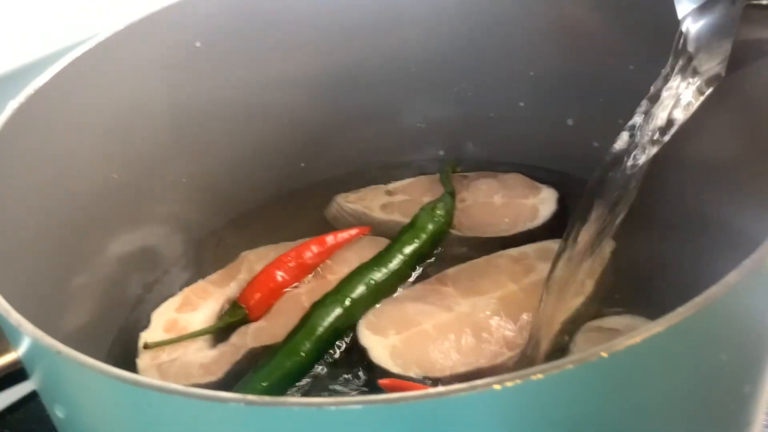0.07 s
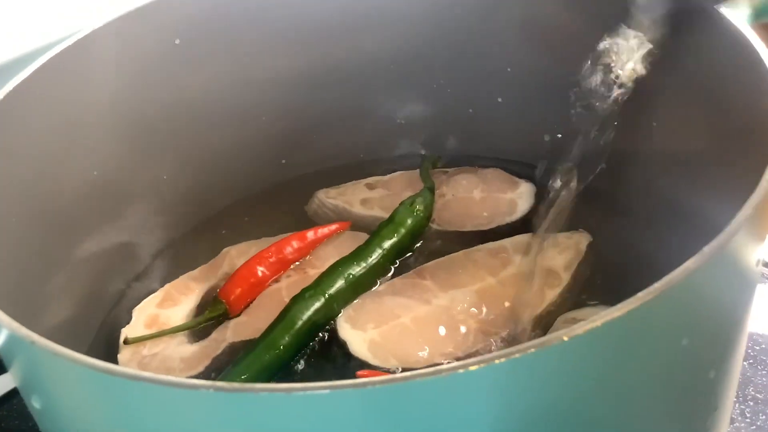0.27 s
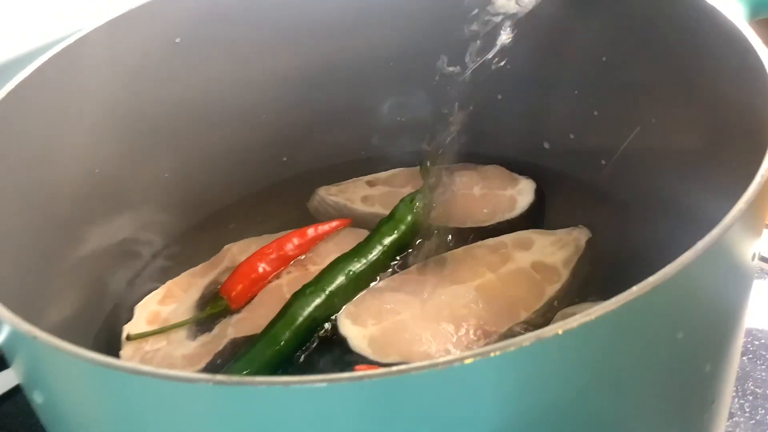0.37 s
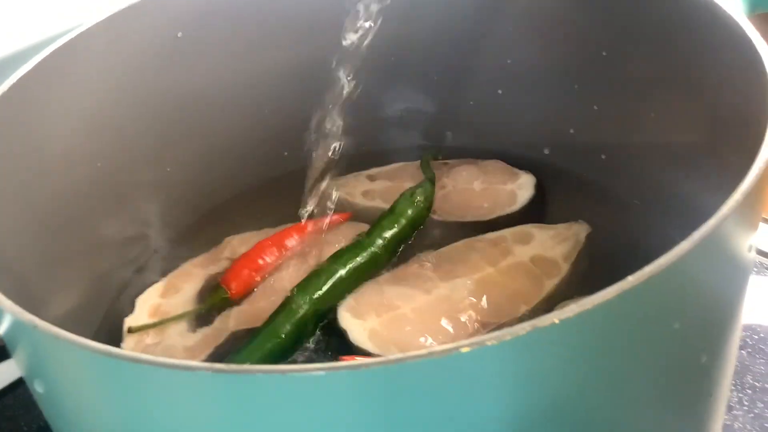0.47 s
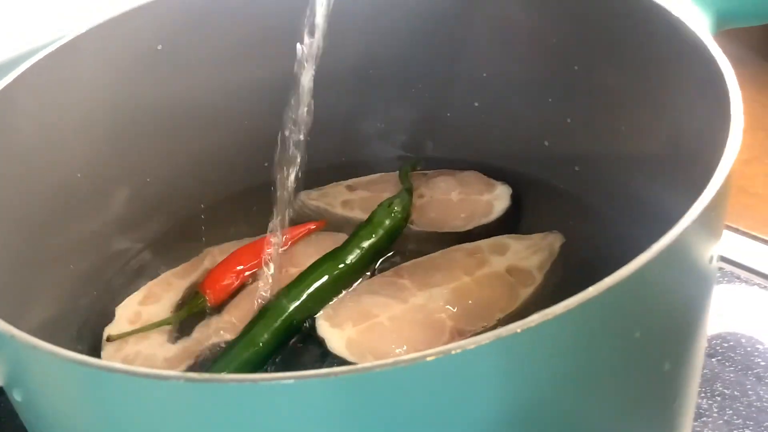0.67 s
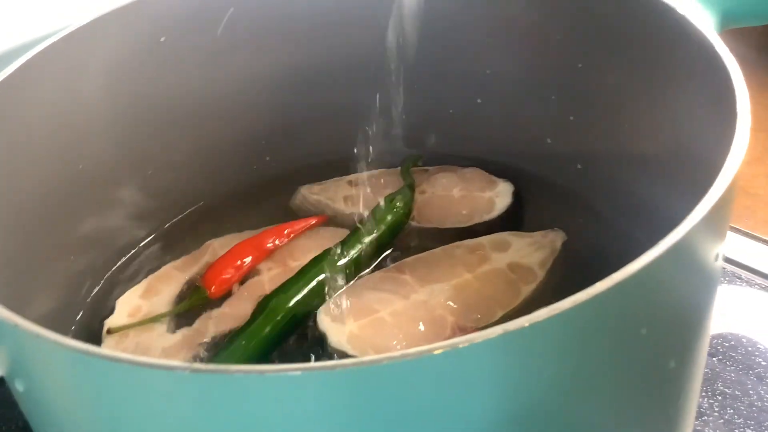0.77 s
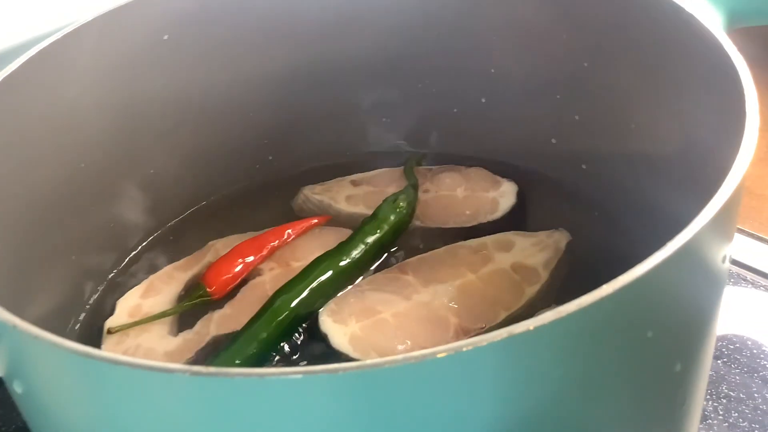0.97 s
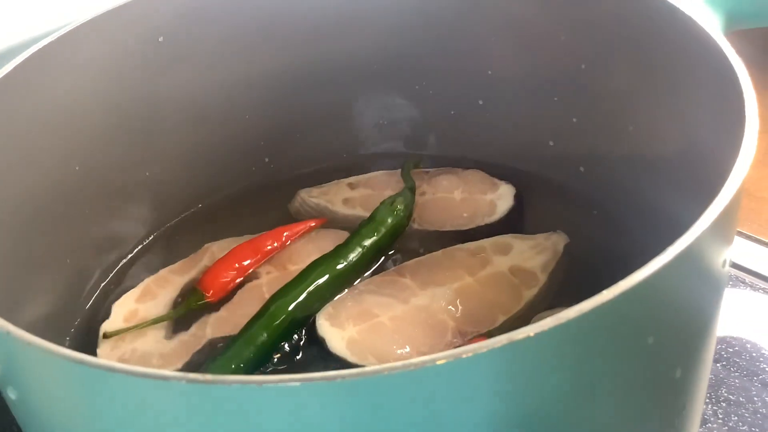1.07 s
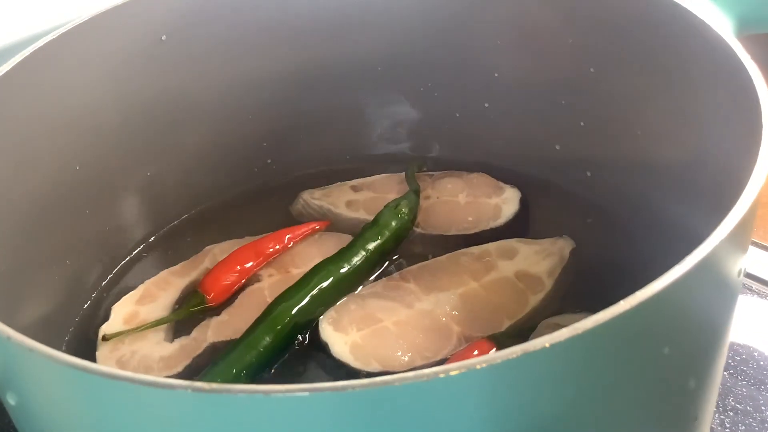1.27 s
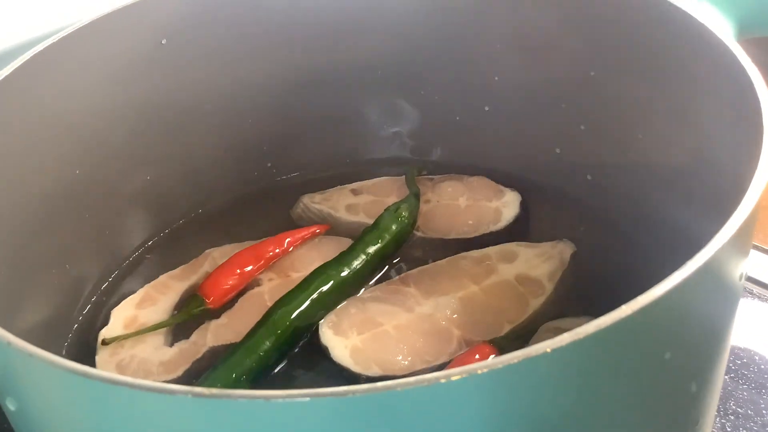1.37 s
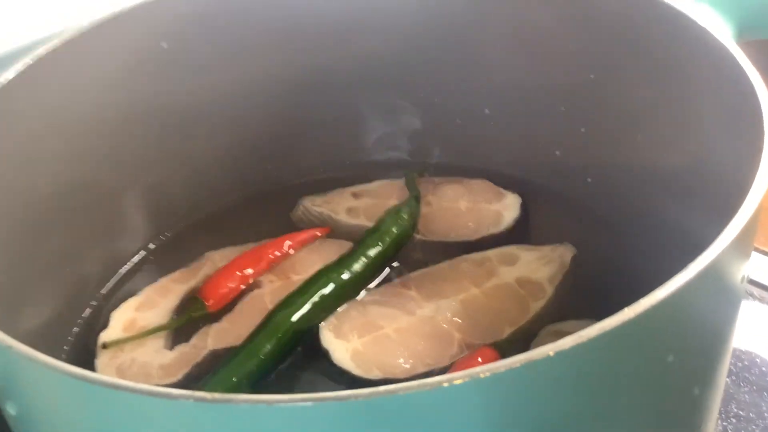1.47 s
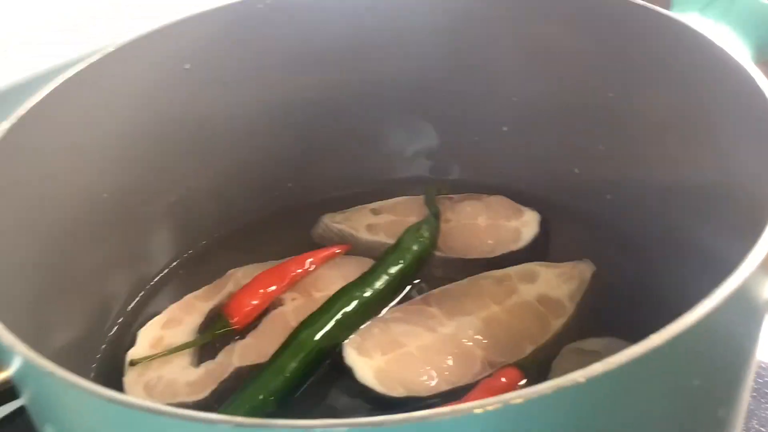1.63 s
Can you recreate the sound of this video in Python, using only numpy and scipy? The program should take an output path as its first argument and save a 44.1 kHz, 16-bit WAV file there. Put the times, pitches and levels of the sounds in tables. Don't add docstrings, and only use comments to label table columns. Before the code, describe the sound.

Water pours into a metal pot from the start, a light fizzing stream with small splashes, droplets and low gulps around 0.2-0.3 s. It thins near 0.45 s, then breaks into louder slapping splashes from 0.55 to 0.85 s, with bright ringing bubbles and short gurgles. By 1.05 s only faint drips remain over a quiet fridge hum. From 1.5 s something rubs softly along the counter.

```python
import sys
import numpy as np
from scipy import signal
from scipy.io import wavfile

SR = 44100
rng = np.random.default_rng(int(sys.argv[2]) if len(sys.argv) > 2 else 0)


def volts(x):
    e = np.asarray(x, float) / 20
    return 10 ** e


def bounce(signal):
    frames = np.transpose(np.atleast_2d(signal))
    limited = np.clip(frames, -1, 1)
    pcm = np.round(limited * 32767).astype(np.int16)
    wavfile.write(sys.argv[1], SR, pcm)


N = 74970

# pitch_hz, level_db (per Hz)
RUMBLE_COLOUR, RUMBLE_DB = [(30, -30), (80, 0), (200, -10), (420, -17), (750, -36), (2200, -45),
                            (5000, -50), (16000, -46)], -61.5
HUM_HZ, HUM_DB, HUM_WOBBLE_DB, HUM_WOBBLE_PER_S = 120, -56.5, 1.6, 9

# time_s, level_db
FLOW = [(0, -58.5), (.33, -61.5), (.4, -63), (.435, -70.5), (.46, -67.5), (.485, -68.5), (.51, -61),
        (.56, -72), (.61, -67.5), (.68, -55.5), (.75, -73), (.8, -62.5), (.86, -59), (.95, -68.5),
        (1.05, -78.5), (1.2, -81), (1.7, -83)]
# pitch_hz, level_db (per Hz)
SPRAY_COLOUR, SPRAY_DB = [(180, -21.5), (300, 2.5), (412, -3), (502, -9.5), (5520, -12.5), (16000, -25)], -0.5
FIZZ_PER_S, FIZZ_CYCLES, POUR_END_S = 2200, 40, 1.05
MIST_HZ, MIST_DB = 5150, -0.5

# start_s, peak_db, pitch_hz, cycles_to_die
DROPLETS = [(.003, -49.5, 3970, 40), (.011, -50, 2020, 30), (0.018, -49, 3680, 40),
            (0.041, -52.5, 3450, 35), (0.064, -50, 2000, 25), (0.065, -52, 940, 18), (0.109, -43, 5900, 50),
            (0.112, -56, 1010, 16), (0.117, -49, 3020, 50), (0.151, -52.5, 2370, 45), (.172, -56, 2040, 35),
            (.352, -51.5, 1070, 25), (.325, -39.5, 2920, 30), (.376, -51, 7200, 60),
            (.391, -51.5, 2010, 30), (.402, -50.5, 2130, 25), (.428, -51, 2250, 50), (0.46, -55, 2000, 25),
            (.497, -48.5, 4930, 90), (.507, -56, 534, 14), (0.523, -48, 3420, 50), (0.551, -48, 4660, 40),
            (0.569, -49, 3320, 60), (0.601, -54.5, 2900, 70), (.620, -53, 1050, 14), (.632, -40, 2700, 30),
            (.645, -46, 5200, 70), (.656, -46.5, 5000, 50), (0.678, -56.5, 3130, 50),
            (0.701, -42.5, 4900, 70), (0.755, -45, 4200, 50), (0.774, -45, 2940, 50), (.801, -43, 3350, 45),
            (0.815, -42.5, 2840, 70), (.820, -40.5, 3700, 60), (.815, -37.5, 890, 16),
            (.866, -53, 1890, 60), (0.876, -54.5, 2690, 60), (0.906, -54, 1530, 60),
            (.326, -41.5, 1785, 25)]
DROPLET_ATTACK_CYCLES = 3.0

# start_s, peak_db, brightness_db_per_octave
SPLASHES = [(0.0377, -35, 3.5), (0.0764, -48, 21.5), (0.1088, -40, -2), (0.145, -46, 20),
            (0.181, -38.5, 10.5), (0.2694, -34.5, 2.5), (0.3204, -34.5, 2), (0.384, -42.5, 14.5),
            (0.459, -36.5, 5), (0.4895, -43.5, 3.5), (0.5187, -40, 3.5), (0.5482, -37, 15.5),
            (0.5706, -26.5, 9), (0.5924, -41, 14), (0.614, -33.5, 6), (0.631, -24, 5), (0.67, -25.5, 2.5),
            (0.701, -29.5, 5), (0.738, -28.5, 11), (0.7641, -33, 1.5), (0.7937, -31.5, 13.5),
            (0.8349, -25.5, 10.5), (0.897, -36.5, 10.5), (0.9145, -48, 4), (1.0195, -63.5, 25),
            (1.504, -56, 11)]
# pitch_hz, level_db (per Hz)
SPLASH_COLOUR = [(200, -26), (500, -3.5), (1300, -25), (3100, -5), (16000, -17.5)]
SPLASH_T60_S, SPLASH_ATTACK_S = 0.076, 0.0015
SPLASH_DB, SPLASH_GRAIN_DB, SPLASH_NOISE_DB = -11.5, 5.3, -8
SPLASH_FIZZ_PER_S, SPLASH_FIZZ_CYCLES, SPLASH_FIZZ_DB = 3500, 70, 1.0

# start_s, peak_db, pitch_hz
SLAPS = [(.039, -64, 2520), (.227, -48.5, 900), (.3235, -27.5, 2600), (.386, -45, 1090), (.432, -47, 1180),
         (.491, -40, 2200), (.495, -45.5, 585), (.617, -38, 1860), (.673, -41.5, 802), (.702, -43.5, 660),
         (.8055, -28, 650), (.898, -46, 4000)]
SLAP_CYCLES, SLAP_ATTACK_CYCLES = 3.6, 0.45

# start_s, peak_db, pitch_hz, spread_s
SMALL_BUBBLES = [(.105, -46, 5050, 0.018), (.257, -46, 4030, 0.016), (.445, -44, 7950, 0.0039),
                 (.458, -47.5, 5950, 0.0083), (.492, -42.5, 4960, 0.0069), (.522, -44.5, 4600, 0.0086),
                 (.548, -39, 9000, 0.0065), (.566, -27.5, 7030, 0.0041), (.567, -25, 9260, 0.0032),
                 (.5675, -32, 4670, 0.0024), (.632, -22, 5110, 0.003), (.6362, -24, 4920, .005),
                 (.669, -36.5, 4900, .022), (.672, -37, 4240, 0.022), (.7235, -35, 4020, 0.0063),
                 (.724, -31.5, 4660, 0.0088), (.741, -36.5, 9000, 0.0083), (.766, -41, 5250, 0.006),
                 (.793, -33, 4740, 0.018), (.793, -30, 11150, .005), (.8385, -37, 12400, .005)]
# start_s, peak_db, pitch_hz
MIDDLE_BUBBLES = [(0.183, -47.5, 2800), (0.323, -82, 1770), (.423, -51, 2210), (.493, -47, 1655),
                  (0.594, -48.5, 2340), (0.617, -36.5, 2240), (.622, -37.5, 2666), (0.705, -41, 3500),
                  (0.725, -31, 3610), (0.769, -42, 3010), (.767, -46.5, 1930), (.793, -54, 2100),
                  (.812, -43.5, 3200), (.833, -35.5, 1937)]
# start_s, peak_db, pitch_hz
BIG_BUBBLES = [
    (.225, -45, 1060),
    (.275, -40, 1110),
    (.387, -47.5, 500),
    (.494, -41.5, 537),
    (.578, -53.5, 554),
    (.673, -44.5, 920),
    (.702, -47, 568),
    (.767, -56.5, 1080),
    (.807, -40, 573),
    (.846, -60, 800),
]
# start_s, peak_db, middle_pitch_hz, length_s
GURGLES = [
    (.262, -47, 1200, 0.06),
    (.265, -50.5, 510, 0.058),
    (0.73, -56, 650, 0.053),
    (.806, -43, 683, .035),
    (.85, -54, 1350, 0.097),
    (0.64, -58.5, 700, 0.023),
    (0.93, -65.5, 1130, 0.1),
    (0.285, -47.5, 1400, 0.049),
]
BUBBLE_RISE, BUBBLE_ATTACK_CYCLES, BUBBLE_SPREAD_S = 0.078, 3.59, 0.006
CYCLES_AT_1K, CYCLES_GROWTH = 21.2, 0.45
GURGLE_PITCH_SPREAD, SWARM_PITCH_SPREAD, SWARM_LOSS_DB = 0.2654, 0.071, 12
GURGLE_CLIMB = 0.3

# peak_s, peak_db, pitch_hz, swell_s
GULPS = [(0.179, -46.5, 298, 0.0027), (0.217, -42.5, 287.8, 0.016), (.236, -31, 315, 0.0058),
         (.268, -51, 350, 0.011), (0.327, -44, 197, 0.003), (.497, -39.5, 316, 0.0023),
         (.845, -45, 334, 0.0025), (.858, -36.5, 384, 0.004), (.869, -33.5, 345.3, 0.0042),
         (0.888, -46, 368, 0.0036), (.3, -52.5, 507, 0.015)]
# peak_s, peak_db, pitch_hz, swell_s
SINKING = [
    (.527, -53.5, 345, .012),
    (.556, -53.5, 342, .013),
    (.585, -52.5, 309, .009),
    (.585, -53, 578, .008),
]
GULP_RISE, SINK_RISE = 0.06, -0.025

# start_s, peak_db, pitch_hz
DRIPS = [(0.944, -60.5, 3680), (0.96, -62.5, 3370), (0.98, -57.5, 9000), (.909, -46, 9000),
         (.966, -59, 6300), (.992, -66.5, 2770), (1.002, -67, 3900), (1.031, -64.5, 6200),
         (1.05, -69, 3970), (1.079, -63.5, 3940), (1.118, -59, 2757), (1.369, -67.5, 8900)]
DRIP_CYCLES = 114
DRIP_TWIN, DRIP_TWIN_DB, DRIP_LAG_S = 0.95, -7, 0.003

PAN_DIP_HZ, PAN_DIP_WIDTH_HZ, PAN_DIP_DEPTH = 1370, 910, 0.58
PAN_ECHO_S, PAN_ECHO_DB, PAN_ECHO_HZ = 0.0038, -9, 9000
KITCHEN_T60_S, KITCHEN_DB, WALL_CUT_HZ = 0.33, -18.5, 2400

# time_s, level_db
SLIDE = [
    (1.5, -63),
    (1.56, -74.5),
    (1.59, -59),
    (1.63, -62),
    (1.7, -54),
]
# pitch_hz, level_db (per Hz)
SLIDE_COLOUR = [(200, -1.5), (400, 0.5), (1500, -10), (3300, -8), (6000, -15.5), (16000, -29.5)]


def rms_one(x):
    return x / np.sqrt(np.mean(x ** 2) + 1e-20)


def in_time(rows):
    return np.interp(np.arange(N) / SR, *np.transpose(rows))


def drift(rate):
    r = np.exp(-80 * np.pi * rate / SR)
    slow = signal.lfilter([1], [1, -2 * r, r * r], rng.standard_normal(N // 40 + 2002))[2000:]
    return np.interp(np.arange(N) / 40, np.arange(len(slow)), rms_one(slow))


def bands(spectrum, patchy_db, rate, tilt=0):
    out, power = 0, 0
    edges = 30 * 2 ** np.arange(0, 9.6, .5)
    white = rng.standard_normal((2, N))
    f, db = np.transpose(spectrum)
    for k, (low, high) in enumerate(zip(edges, edges[1:])):
        hz = np.sqrt(low * high)
        level = np.interp(np.log(hz), np.log(f), db, left=db[0] - 12 * np.log2(f[0] / hz))
        band_pass = signal.butter(2, [low, high], "band", fs=SR, output="sos")
        band = signal.sosfilt(band_pass, white[k % 2])
        out = out + band * volts(level + patchy_db * drift(rate) + tilt * np.log2(hz / 8000))
        power += np.mean(band ** 2) * volts(2 * level)
    return out / np.sqrt(power)


def add(out, s, shape):
    i = max(int(s * SR), 0)
    out[i:i + len(shape)] += shape[:N - i]


def fridge():
    t = np.arange(N) / SR
    level = volts(HUM_DB + HUM_WOBBLE_DB * drift(HUM_WOBBLE_PER_S))
    hum = np.sqrt(2) * level * np.sin(2 * np.pi * HUM_HZ * t + .3 * drift(4))
    return hum + volts(RUMBLE_DB) * bands(RUMBLE_COLOUR, patchy_db=.8, rate=12)


def fizz(per_s, cycles, tilt=0):
    born = rng.random(N) < per_s * volts(5 * drift(25)) / SR
    strength = volts(4.0 * np.minimum(rng.exponential(1, N), 4))
    pushes = born * strength * rng.choice([-1, 1], N) + 1e-18
    dealt = rng.integers(0, 40, N)
    out, flat = 0, 0
    for k, hz in enumerate(np.geomspace(750, 15000, 40)):
        r, w = volts(-60 * hz / cycles / SR), 2 * np.pi * hz / SR
        ring = signal.lfilter([0, np.sin(w)], [1, -2 * r * np.cos(w), r * r], pushes * (dealt == k))
        ring = (hz / 1000) ** 0.39 * ring
        out = out + ring * volts(tilt * np.log2(hz / 8000))
        flat = flat + ring
    return out / np.sqrt(np.mean(flat ** 2))


def stream():
    tiny = fizz(FIZZ_PER_S, FIZZ_CYCLES)
    spray = bands(SPRAY_COLOUR, patchy_db=5.0, rate=28) * volts(SPRAY_DB)
    wet = spray + tiny
    high_pass = signal.butter(2, MIST_HZ, "high", fs=SR, output="sos")
    mist = signal.sosfilt(high_pass, wet) * volts(MIST_DB)
    pouring = np.clip((POUR_END_S - np.arange(N) / SR) / 0.25, 0, 1)
    return volts(in_time(FLOW)) * (wet * pouring + mist * (1 - pouring))


def bubble(hz, cycles, phase, attack=BUBBLE_ATTACK_CYCLES):
    t60 = cycles / hz
    t = np.arange(int(t60 * SR)) / SR
    swell = np.sin(np.pi / 2 * np.minimum(t * hz / attack, 1)) ** 2
    fade = volts(-60 * np.maximum(t - attack / hz, 0) / t60)
    climbing = 1 + BUBBLE_RISE * (t / t60 - .3)
    return swell * fade * np.sin(phase + 2 * np.pi * hz * t * climbing)


def droplets():
    out = np.zeros(N)
    for s, db, hz, cycles in DROPLETS:
        add(out, s, volts(db) * bubble(hz, cycles, 0, DROPLET_ATTACK_CYCLES))
    return out


def splashes():
    gain, weighted = np.zeros(N), np.zeros(N)
    t = np.arange(int(SPLASH_T60_S * SR)) / SR
    for s, db, tilt in SPLASHES:
        fade = volts(db + SPLASH_DB - 60 * t / SPLASH_T60_S)
        shape = fade * (1 - np.exp(-t / SPLASH_ATTACK_S))
        add(gain, s, shape)
        add(weighted, s, shape * tilt)
    tilt = weighted / (gain + 1e-12)
    hiss = bands(SPLASH_COLOUR, patchy_db=SPLASH_GRAIN_DB, rate=14.0, tilt=tilt)
    froth = fizz(SPLASH_FIZZ_PER_S, SPLASH_FIZZ_CYCLES, tilt)
    return gain * (volts(SPLASH_NOISE_DB) * hiss + volts(SPLASH_FIZZ_DB) * froth)


def slaps():
    out = np.zeros(N)
    for s, db, hz in SLAPS:
        add(out, s, -volts(db) * bubble(hz, SLAP_CYCLES, 0, SLAP_ATTACK_CYCLES))
    return out


def swarms(rows, spread, count, climb=0):
    out = np.zeros(N)
    chances = rng.random((len(rows), 3, count))
    for (s, db, hz, length), (when, pitch, phase) in zip(rows, chances):
        for k in range(count):
            follows = k > 0
            late = (k - when[k]) / max(count - 1, 1) * follows
            detune = spread * np.sqrt(3) * (2 * pitch[k] - 1) * follows
            f = hz * np.exp(detune + climb * (late - .5))
            cycles = CYCLES_AT_1K * (f / 1000) ** CYCLES_GROWTH
            ring = bubble(f, cycles, 2 * np.pi * phase[k])
            add(out, s + late * length, volts(db - SWARM_LOSS_DB * late) * ring)
    return out


def bubbles():
    single = [(*b, BUBBLE_SPREAD_S) for b in MIDDLE_BUBBLES + BIG_BUBBLES]
    out = swarms(SMALL_BUBBLES, SWARM_PITCH_SPREAD, count=4)
    out += swarms(GURGLES, GURGLE_PITCH_SPREAD, count=26, climb=GURGLE_CLIMB)
    out += swarms(single, SWARM_PITCH_SPREAD, count=2)
    return out


def gulps(rows, rise):
    out = np.zeros(N)
    for s, db, hz, swell in rows:
        u = np.arange(-3 * swell * SR, 4 * swell * SR) / SR / swell
        shape = np.exp(-u ** 2 / 2 / np.where(u < 0, 1, 1.6))
        tone = np.sin(2 * np.pi * hz * swell * u * (1 + rise * u / 2))
        add(out, s - 3 * swell, volts(db) * shape * tone)
    return out


def drips():
    out = np.zeros(N)
    for s, db, hz in DRIPS:
        add(out, s, volts(db) * bubble(hz, DRIP_CYCLES, 0))
        add(out, s + DRIP_LAG_S, volts(db + DRIP_TWIN_DB) * bubble(hz * DRIP_TWIN, DRIP_CYCLES, 0))
    return out


def pan_air(x):
    peak = signal.iirpeak(PAN_DIP_HZ, PAN_DIP_HZ / PAN_DIP_WIDTH_HZ, fs=SR)
    return x - PAN_DIP_DEPTH * signal.lfilter(*peak, x)


def saucepan(x):
    lag, dull = int(PAN_ECHO_S * SR), np.exp(-2 * np.pi * PAN_ECHO_HZ / SR)
    out, echo = x.copy(), x
    for _ in range(3):
        late = np.r_[np.zeros(lag), echo[:-lag]]
        echo = volts(PAN_ECHO_DB) * signal.lfilter([1 - dull], [1, -dull], late)
        out = out + echo
    return out


def kitchen(x):
    out, dull = np.zeros(N), np.exp(-2 * np.pi * WALL_CUT_HZ / SR)
    lags = (rng.uniform(.011, .035, 10) * SR).astype(int)
    for k, lag in enumerate(lags):
        loop, state = x.copy(), [0.]
        gain = volts(-60 * lag / SR / KITCHEN_T60_S)
        for i in range(lag, N, lag):
            back, state = signal.lfilter([gain * (1 - dull)], [1, -dull], loop[i - lag:i], zi=state)
            loop[i:i + lag] += back[:N - i]
        out += (loop - x) * (-1) ** k
    return out


def slide():
    start = np.clip((np.arange(N) / SR - SLIDE[0][0]) / 0.05, 0, 1)
    return start * volts(in_time(SLIDE) + 2.5) * bands(SLIDE_COLOUR, patchy_db=1.5, rate=40)


def scene():
    in_pan = bubbles() + drips() + droplets() + slaps() + pan_air(splashes())
    pockets = gulps(GULPS, GULP_RISE) + gulps(SINKING, SINK_RISE)
    water = saucepan(in_pan) + pockets + pan_air(stream())
    mix = water + volts(KITCHEN_DB) * kitchen(water) + fridge() + slide()
    return mix[None]


def band_limit(x):
    return signal.sosfilt(signal.butter(12, 16800, fs=SR, output="sos"), x)


def record(dry):
    low_cut = signal.butter(2, 60, "high", fs=SR, output="sos")
    top_cut = signal.cheby2(12, 60, 16000 * 1.04, fs=SR, output="sos")
    mix = signal.sosfilt(top_cut, signal.sosfilt(low_cut, dry))
    return band_limit(mix)


dry = scene()
out = record(dry)
bounce(out)
```